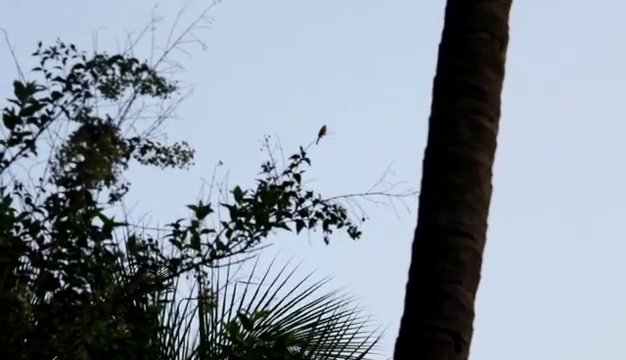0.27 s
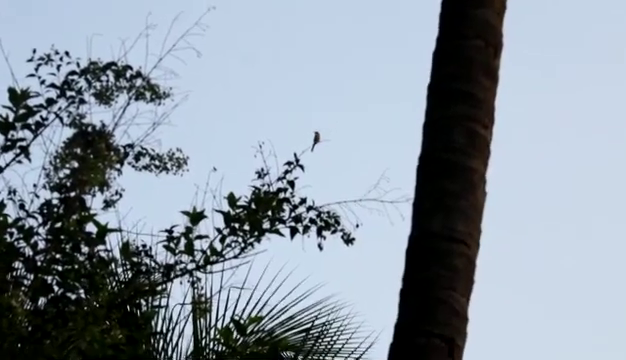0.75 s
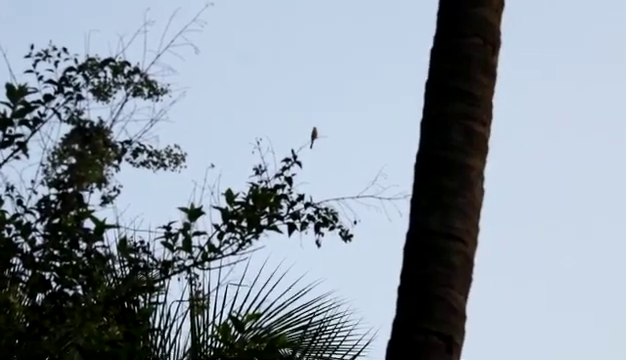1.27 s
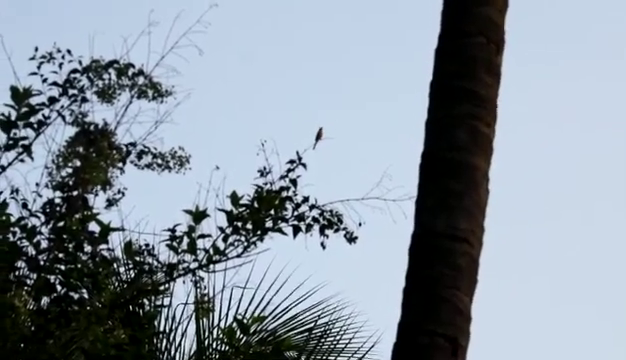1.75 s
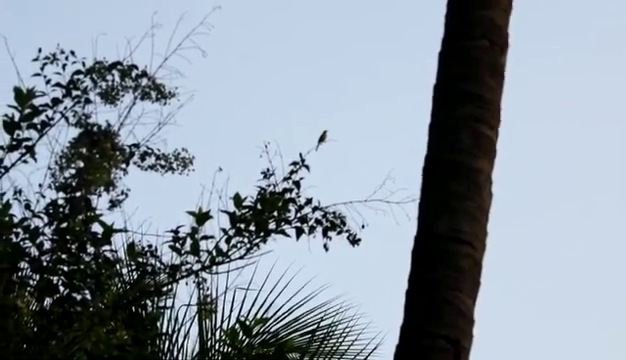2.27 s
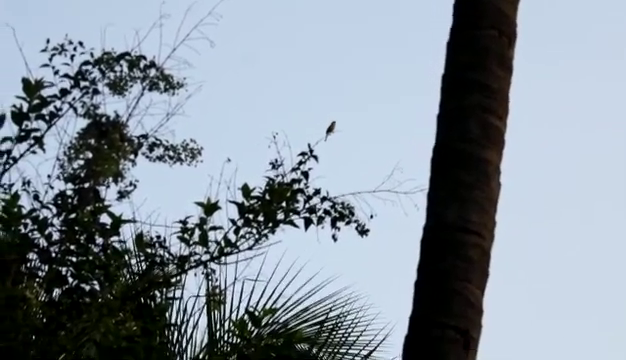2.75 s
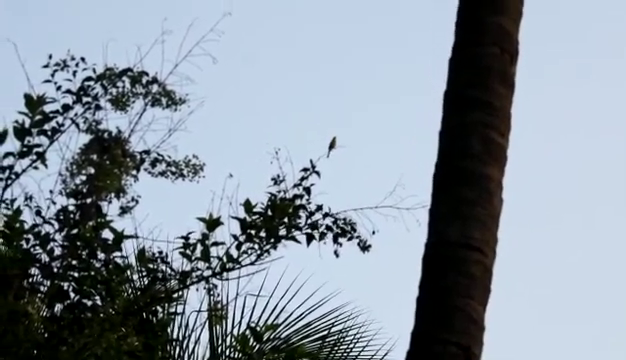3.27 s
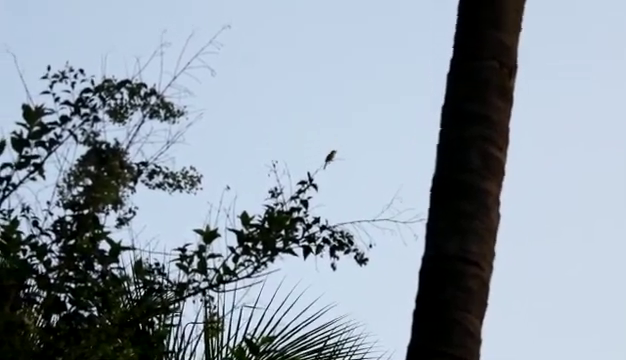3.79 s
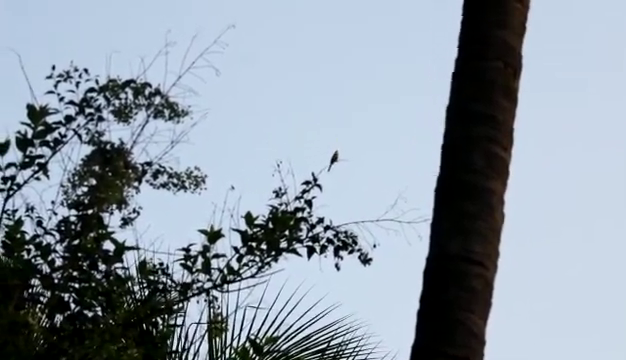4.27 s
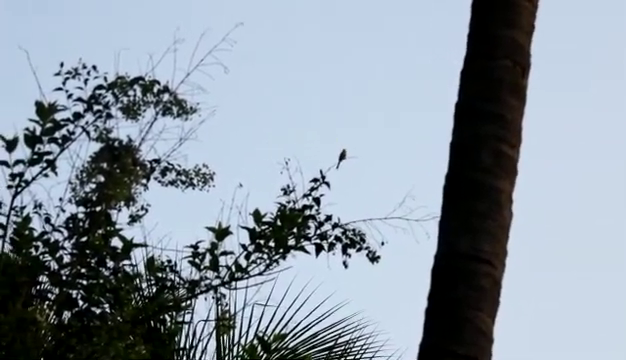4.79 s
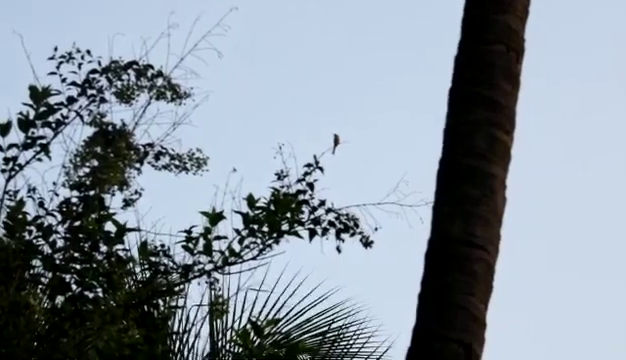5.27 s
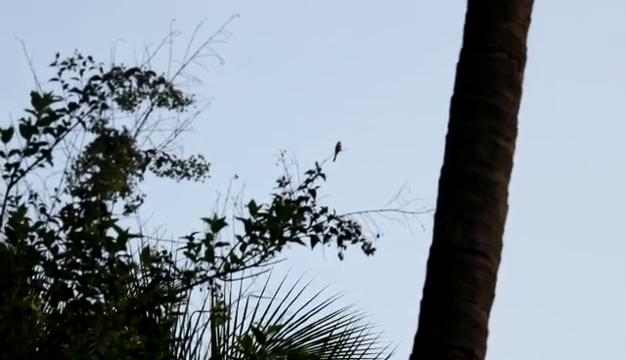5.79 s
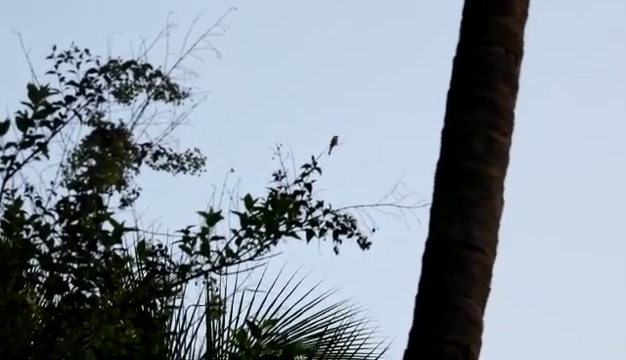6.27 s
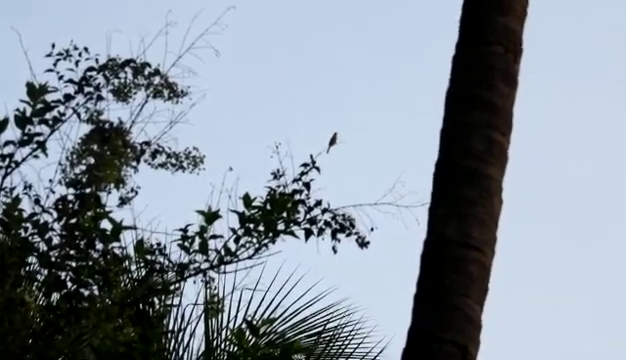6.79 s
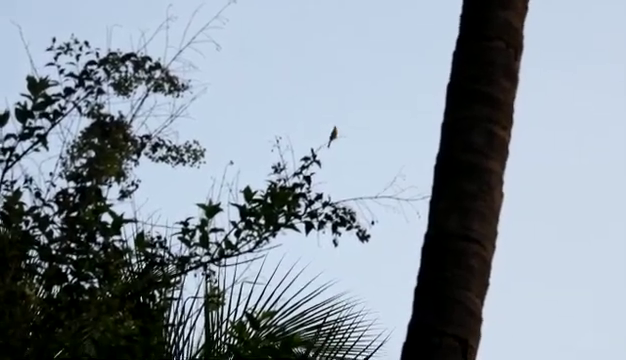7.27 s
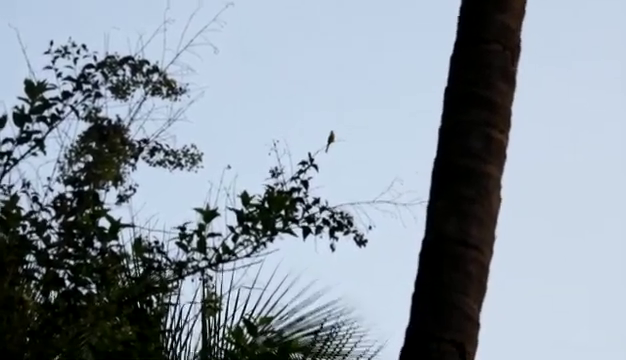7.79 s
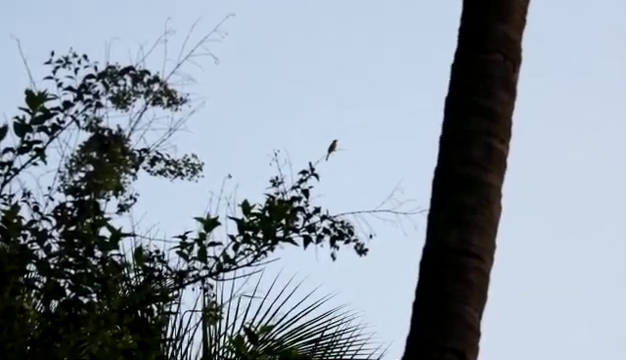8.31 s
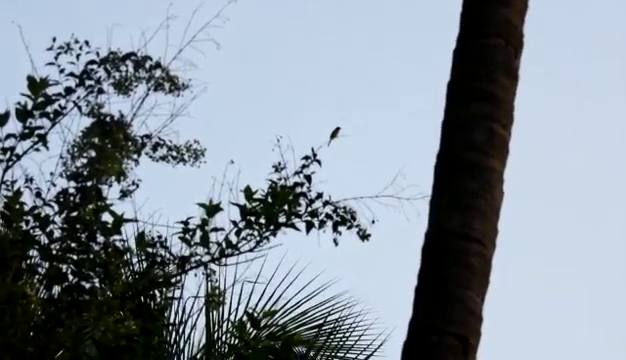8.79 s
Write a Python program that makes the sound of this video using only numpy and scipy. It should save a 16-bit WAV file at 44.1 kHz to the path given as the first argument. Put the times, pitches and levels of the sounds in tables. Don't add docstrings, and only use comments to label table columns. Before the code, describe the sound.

Bright, rapid birdsong repeats in two runs with a quiet pause between, ringing off a wall above soft insect hiss and low outdoor hum.

```python
import sys
import numpy as np
from scipy import signal
from scipy.fft import rfft, irfft, next_fast_len
from scipy.io import wavfile

SR = 44100
rng = np.random.default_rng(int(sys.argv[2]) if len(sys.argv) > 2 else 0)


def wav_out(sig):
    wavfile.write(sys.argv[1], SR, np.round(np.clip(np.atleast_2d(sig).T, -1, 1) * 32767).astype(np.int16))


def level_to_linear(level):
    exponent = np.asarray(level, float) / 20
    return 10 ** exponent


N = 398663


def columns(rows, s):
    at, *values = np.transpose(rows)
    return [np.interp(s, at, v) for v in values]


def at_hz(points, hz):
    at, values = np.array(points)[:, 0], np.array(points)[:, 1]
    return np.interp(np.log(hz + 1), np.log(at), values)


def rms_one(x):
    return x / np.sqrt(np.mean(np.abs(x) ** 2) + 1e-20)


def add(out, s, sound):
    i = round(s * SR)
    out[i:i + len(sound)] += sound[:max(len(out) - i, 0)]


def drift(rate_hz):
    sos = signal.butter(2, rate_hz, fs=SR, output="sos")
    return rms_one(signal.sosfilt(sos, rng.standard_normal(N + SR))[SR:])


def band_pass(low_hz, high_hz, x):
    return signal.sosfilt(signal.butter(2, [low_hz, high_hz], "band", fs=SR, output="sos"), x)


def whistle(hz):
    return np.sin(2 * np.pi * np.cumsum(hz) / SR)


def singer(still):
    phrases = [(1.1698, -1.7, -5, 2.5), (1.4552, 0.2, -3.5, 0.5), (1.7137, 0.083, -2, 3),
               (2.002, .4, -1, 0.5), (2.2639, 0.28, -2, 0), (2.544, -0.36, -4, 2.5),
               (2.8307, 0.39, -1.4, 0.8), (3.1146, 1, -2.5, 0.5), (3.4427, .2, -2.5, 1.5),
               (3.728, -0.32, -1, 1), (4.0091, -1.4, -3, 6), (6.7792, 0.63, -8.7, -2),
               (7.0583, 0.13, -2, 3.5), (7.3342, 1, 0.5, 3), (7.6057, 0.67, 2, 2), (7.8719, 1, -1.5, -1.3),
               (8.1634, -1, -0.5, 1), (8.448, .7, -3, -0.5), (8.7226, -0.59, -1.8, 0.5), (9.014, 0, 0, 0)]
    near, wall = np.zeros(N), np.zeros(N)
    chance = rng.standard_normal((len(phrases), 2, 4))
    for (start, effort_db, opening_db, falling_db), (pitch, strength) in zip(phrases, chance):
        phrase = sung_phrase(effort_db, opening_db, falling_db, pitch, strength)
        add(near, start, phrase)
        add(near, start, signal.fftconvolve(phrase, foliage(still)))
        add(wall, start, phrase)
    return near + wall_echo(wall)


def sung_phrase(effort_db, opening_db, falling_db, pitch, strength):
    # (time after phrase start [s], pitch [Hz], level [dB])
    notes = [
        [(.001, 4610, -25.5), (.010, 4350, -5), (.018, 4308, 1.5), (.021, 4300, -0.5), (.025, 4300, -26)],
        [(.024, 5360, -43), (.028, 4930, -19.5), (.034, 4747, -7.5), (.045, 4712, 0.4), (.048, 4690, -1.5),
         (.052, 4450, -33.5)],
        [(.0505, 7070, -36.5), (.052, 6226, -25), (.0545, 5510, -17.5), (.063, 5340, -5.5), (.075, 5110, 2.5),
         (.079, 5030, -1), (.082, 5170, -25)],
        [(.085, 3674, -38), (.092, 3798, -8), (.100, 3970, 0.5), (.111, 4541, 0), (.117, 4848, 4),
         (.122, 5144, -6), (.127, 5240, -24.5)],
    ]
    usual_db, spread_db = np.array([-23.5, -20, -17, -17.5]), 0.96
    pitch_spread, octave_db = 0.0034, -36
    shifts = 1 + pitch_spread * pitch
    levels_db = effort_db + usual_db + [opening_db, 0, falling_db, 0] + spread_db * strength
    phrase = np.zeros(round(.14 * SR))
    for note, level_db, shift in zip(notes, levels_db, shifts):
        start, end = note[0][0], note[-1][0]
        hz, db = columns(note, np.arange(start, end, 1 / SR))
        tone = whistle(shift * hz) + level_to_linear(octave_db) * whistle(2 * shift * hz)
        add(phrase, start, level_to_linear(level_db + db) * tone)
    return phrase


def wall_echo(song):
    # (frequency [Hz], level [dB])
    colour = [(3700, -11), (4000, -2.5), (4500, 1.5), (4900, 0), (5150, -6.5), (5450, -5), (6000, -18)]
    delay_s, level_db, flutter_db = .031, -.5, 1.2
    late, size = np.zeros(N), next_fast_len(N)
    add(late, delay_s, level_to_linear(level_db) * song)
    spectrum = rfft(late * level_to_linear(flutter_db * drift(45)), size)
    return irfft(spectrum * level_to_linear(at_hz(colour, np.fft.rfftfreq(size, 1 / SR))), size)[:N]


def foliage(still):
    # (delay [s], level [dB])
    echoes = [
        (.0024, -14),
        (0.0097, -9),
        (.0182, -27),
        (.038, -13.5),
        (.047, -16),
        (.063, -24),
        (.105, -32),
    ]
    sway_db = 0
    response = still + level_to_linear(sway_db) * clouds()
    for lag, level_db in echoes:
        response[round(lag * SR)] += level_to_linear(level_db)
    return response


def clouds():
    # (level [dB], t60 [s])
    tails = [(-4, 0.32), (-14.5, 1.4)]
    rise_s, strong_share = .045, .004
    s = np.arange(round(1.2 * SR)) / SR
    shape = sum(level_to_linear(level_db - 60 * s / t60) / np.sqrt(t60 * SR / np.log(1e6)) for level_db, t60 in tails)
    sparse = rng.standard_normal(len(s)) * (1 + 12 * (rng.random(len(s)) < strong_share))
    return rms_one(sparse) * shape * np.minimum(s / rise_s, 1)


def far_birds():
    tail_db, tail_t60_s, tail_rise_s = -2.5, 1.4, .022
    flicker_db, lift_db = 2.5, 7.5
    out, waver = np.zeros(N), 1 + .005 * drift(25)
    for start, length, first_hz, last_hz, level_db, warble_hz in far_notes():
        part = np.linspace(0, 1, round(length * SR))
        hz = first_hz + (last_hz - first_hz) * part
        hz += warble_hz * whistle(np.full(len(part), 120.))
        hz = hz * waver[round(start * SR):][:len(hz)]
        add(out, start, level_to_linear(level_db + lift_db) * np.sin(np.pi * part) ** 0.4 * whistle(hz))
    out *= level_to_linear(flicker_db * drift(30))
    s = np.arange(SR) / SR
    tail = rng.standard_normal(SR) * level_to_linear(-60 * s / tail_t60_s) * np.minimum(s / tail_rise_s, 1)
    tail /= np.sqrt(np.sum(tail ** 2))
    return out + level_to_linear(tail_db) * signal.fftconvolve(out, tail)[:N]


def far_notes():
    # (time after part start [s], length [s], first pitch [Hz], last pitch [Hz], level [dB])
    call_pair = [
        (0, .048, 2333, 2446, 0),
        (.004, 0.054, 2543, 2626, -4.5),
    ]
    call_answer = [
        (0, .025, 2730, 2150, -2.5),
        (.018, .04, 1697, 2030, -2),
        (.045, .05, 2166, 2195, -4.5),
        (.08, .15, 2180, 2147, -11),
    ]
    # (time [s], pair level [dB], answer level [dB])
    calls_heard = [
        (1.321, -46, -48),
        (3.285, -54, -67),
        (5.511, -50.5, -49),
    ]
    # (time [s], length [s], first pitch [Hz], level [dB])
    rising = [
        (.14, 0.33, 3440, -61.5),
        (6.93, 0.19, 3290, -61.5),
        (8.265, 0.22, 3320, -58),
    ]
    chips = [
        (2.374, .012, 1560, -51),
        (2.556, .012, 1650, -51),
    ]
    falling = [
        (.72, .26, 3270, -60.5),
        (7.5, 0.044, 3600, -55),
        (7.6, 0.099, 3020, -61),
        (8.06, 0.069, 3600, -61),
    ]
    level_notes = [(.413, 0.051, 3930, -52), (.48, 0.15, 3970, -66), (.57, 0.099, 4180, -62),
                   (.64, 0.15, 4000, -61), (1.0, .12, 4700, -60), (3.645, 0.024, 2050, -52.5),
                   (4.54, 0.31, 2784, -61), (4.7, .12, 3810, -66), (5.6, .23, 3960, -67),
                   (5.83, 0.17, 3760, -59), (5.88, .11, 3990, -60), (6.38, 0.094, 2100, -60),
                   (7.49, 0.055, 1680, -60), (7.76, 0.094, 2080, -59)]
    answer_gap_s, call_warble_hz, whistle_warble_hz = .228, 110, 25
    notes = []
    for s, pair_db, answer_db in calls_heard:
        for part, gap, part_db in ((call_pair, 0, pair_db), (call_answer, answer_gap_s, answer_db)):
            for at, length, first_hz, last_hz, db in part:
                notes.append((s + gap + at, length, first_hz, last_hz, part_db + db, call_warble_hz))
    for rows, ratio in ((rising, 1.12), (chips, 1.12), (falling, .88), (level_notes, 1)):
        for s, length, hz, db in rows:
            notes.append((s, length, hz, ratio * hz, db, whistle_warble_hz))
    return notes


def knock():
    out = np.full(N, 1e-18)
    out[round(2.217 * SR)] = 1
    out = band_pass(270, 850, out)
    return level_to_linear(-26) * out / np.abs(out).max()


def rustles_and_booms():
    # (time [s], low edge [Hz], high edge [Hz], level [dB], t60 [s])
    rustles = [
        (.33, 900, 2200, -43.5, 1.3),
        (2.18, 900, 2920, -39.5, 1.25),
        (2.19, 400, 1300, -40.5, 1.46),
        (4.8, 388.4, 865, -45.5, 2.2),
        (5.96, 249, 2600, -34.5, 1.43),
        (5.985, 1200, 5300, -38, .25),
        (5.988, 2840, 3570, -41, 0.62),
        (5.985, 4430, 9600, -40, 1.35),
        (8.89, 720, 5170, -41.5, 0.94),
    ]
    # (time [s], centre [Hz], level [dB], t60 [s])
    booms = [
        (.37, 89, -51, 3),
        (1, 518, -51, 3.3),
        (2.0, 303, -48, 1.9),
        (4.15, 291, -41, 2.4),
        (4.77, 78.4, -39.5, 1.8),
        (6.02, 212, -43.5, 1.2),
        (6.9, 287, -47, 0.89),
        (8.89, 358, -43, 1.5),
        (8.89, 577, -39.5, 1.7),
    ]
    rise_share = .045
    bands = list(rustles)
    for at, hz, db, t60 in booms:
        half = (18 + .08 * hz) / 2
        bands.append((at, hz - half, hz + half, db, t60))
    out, s = np.zeros(N), np.arange(SR) / SR
    for start, low_hz, high_hz, level_db, t60 in bands:
        band = band_pass(low_hz, high_hz, rng.standard_normal(2 * SR))[SR:]
        swell = np.minimum(s / (rise_share * t60), 1)
        add(out, start, level_to_linear(level_db - 60 * s / t60) * swell * rms_one(band))
    return out


def low_insects():
    # (time [s], centre [Hz], level [dB])
    path = [(0, 5351, -50.5), (.5, 5436, -50), (1.1, 5378, -49.5), (2, 5400, -48.5), (3, 5500, -50),
            (4, 5340, -51), (4.7, 5405, -50), (5.25, 5574, -49.5), (5.75, 5165, -49.5), (6.3, 5490, -48),
            (6.75, 5520, -54.5), (8, 5280, -46), (9.04, 5210, -53)]
    # (pitch [Hz], level [dB])
    crickets = [(5080, -57.5), (5260, -56.5), (5420, -57.5), (5600, -54.5), (5760, -59)]
    centre_hz, level_db = columns(path, np.arange(N) / SR)
    out = level_to_linear(level_db) * chorus(centre_hz, width_hz=890, throb_db=1.0, throb_rate_hz=44)
    for hz, cricket_db in crickets:
        out += level_to_linear(cricket_db) * chorus(hz, width_hz=94, throb_db=3.0, throb_rate_hz=8.5)
    return out


def shrill_insects():
    # (time [s], level [dB])
    path = [(0, -62), (3.5, -61.5), (9.04, -62)]
    level_db, = columns(path, np.arange(N) / SR)
    return level_to_linear(level_db) * chorus(8550, width_hz=430, throb_db=1.5, throb_rate_hz=190)


def chorus(centre_hz, width_hz, throb_db, throb_rate_hz):
    sos = signal.butter(2, width_hz / 2, fs=SR, output="sos")
    a, b = signal.sosfilt(sos, rng.standard_normal((2, N)))
    turn = 2 * np.pi * np.cumsum(centre_hz * np.ones(N)) / SR
    band = a * np.cos(turn) + b * np.sin(turn)
    return rms_one(band * level_to_linear(throb_db * drift(throb_rate_hz)))


def air():
    # (frequency [Hz], level per Hz [dB])
    colour = [(20, -12.5), (65, -4), (170, -3.5), (254, -1.5), (400, -6), (800, -7.5), (2400, -13.5),
              (3700, -17.5), (5000, -14.5), (7000, -20.5), (9000, -24.5), (10000, -35), (12000, -38.5),
              (14500, -49.5)]
    size = next_fast_len(N)
    hz, out = np.fft.rfftfreq(size, 1 / SR), np.zeros(N)
    noise = rfft(rng.standard_normal(size)) * level_to_linear(at_hz(colour, hz))
    for octave in np.arange(4, 14.5, .5):
        share = np.cos(np.pi * np.clip(np.log2(hz + 1) - octave, -.5, .5)) ** 2
        out += irfft(noise * share, size)[:N] * level_to_linear(1.06 * drift(2.95))
    return level_to_linear(-44.5) * rms_one(out)


def scene():
    events = singer(clouds()) + far_birds() + knock() + rustles_and_booms() + low_insects()
    mic_top = signal.butter(5, 8600, fs=SR, output="sos")
    mono = signal.sosfilt(mic_top, events) + shrill_insects() + air()
    return np.array([mono, mono])


def top_cut(x):
    return signal.sosfilt(signal.butter(12, 14260, fs=SR, output="sos"), x)


def record(dry):
    return top_cut(dry)


dry = scene()
out = record(dry)
wav_out(out)
```